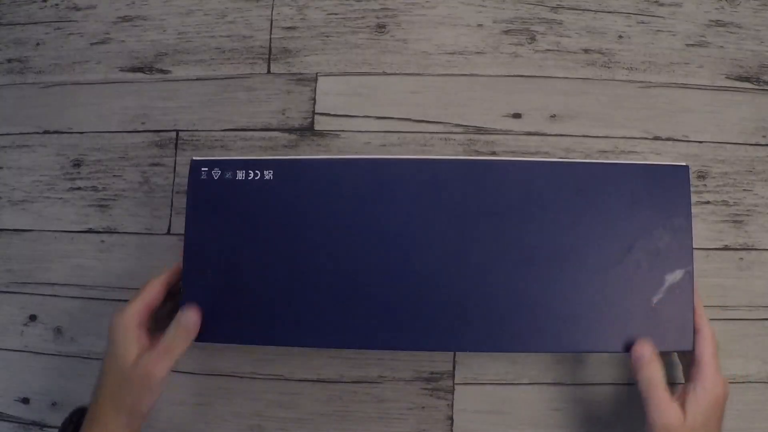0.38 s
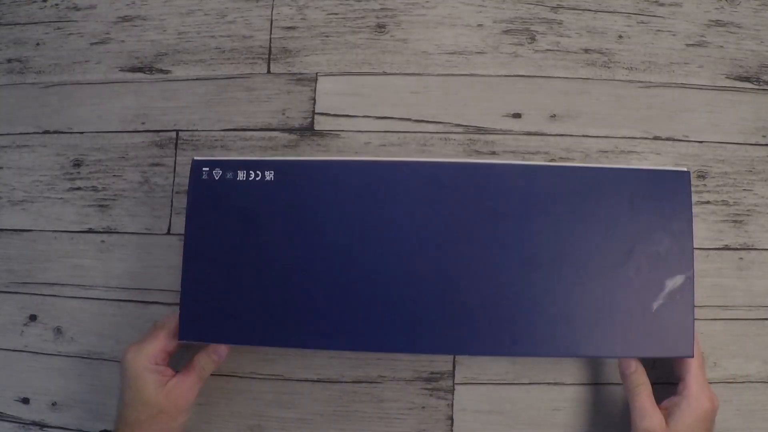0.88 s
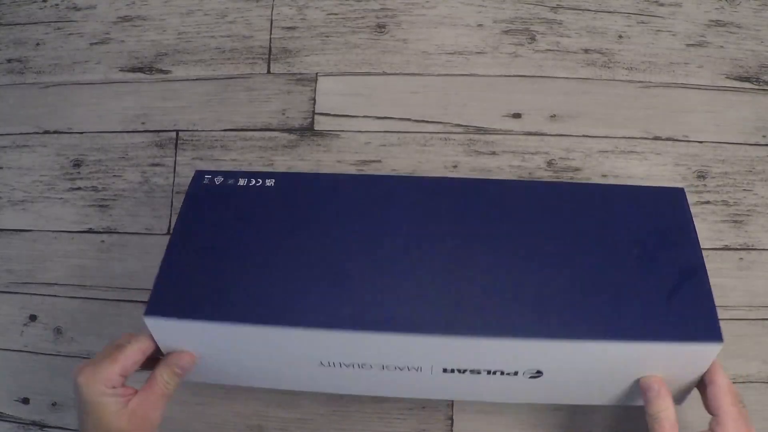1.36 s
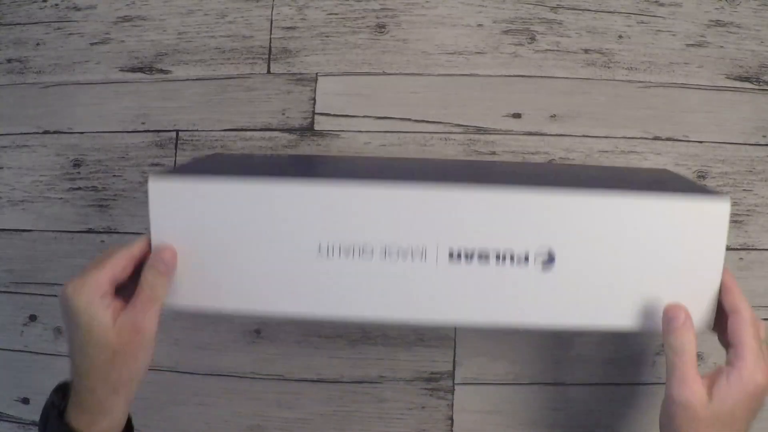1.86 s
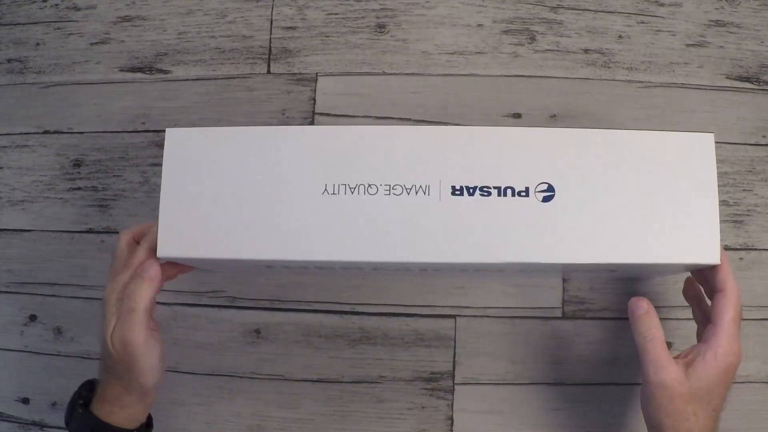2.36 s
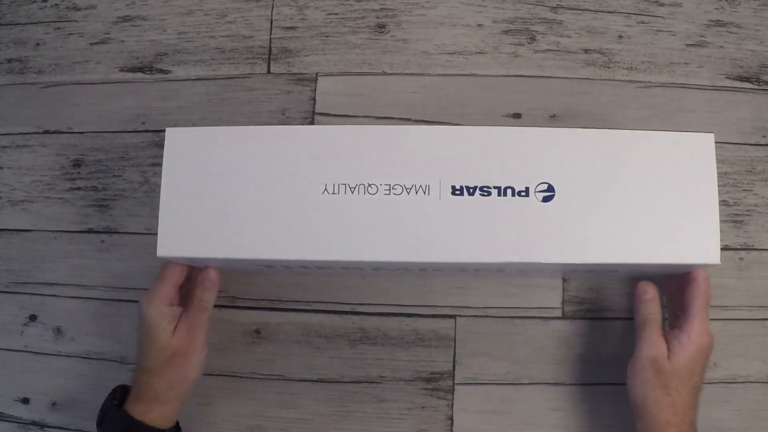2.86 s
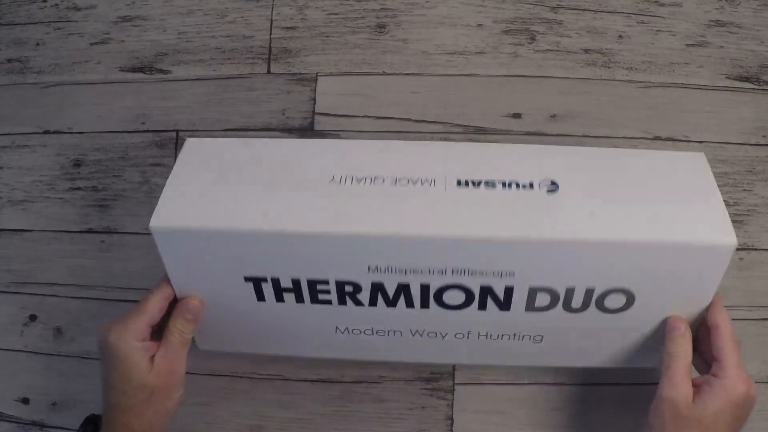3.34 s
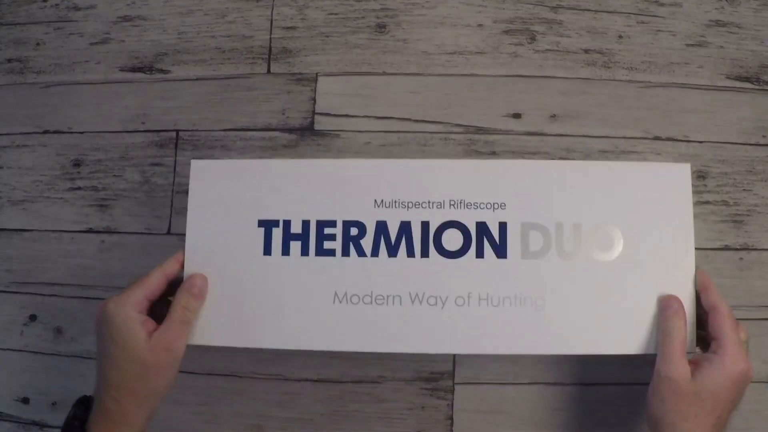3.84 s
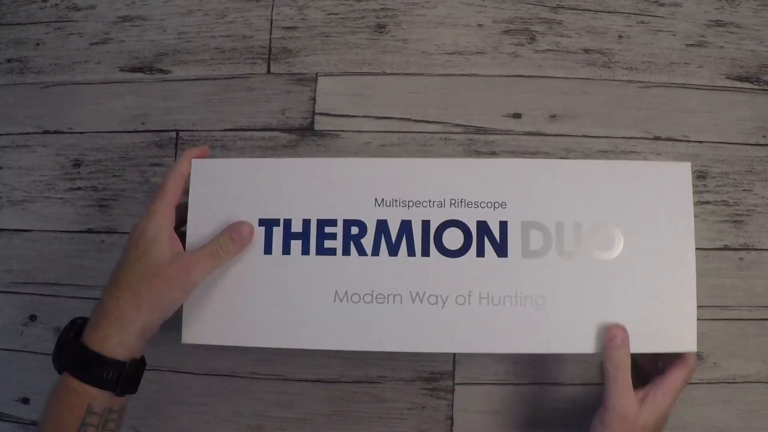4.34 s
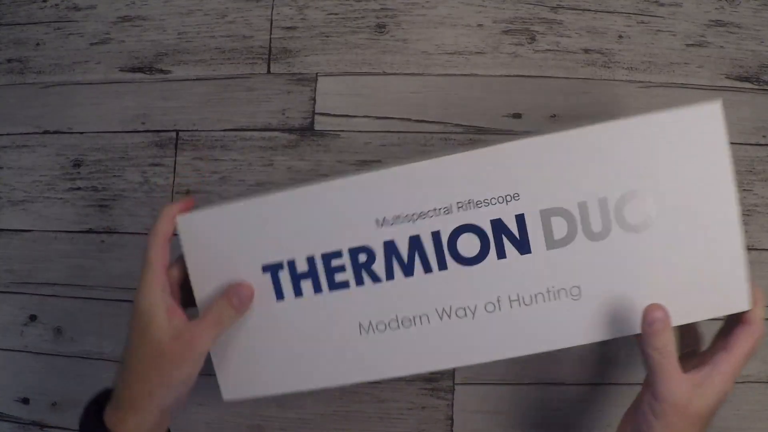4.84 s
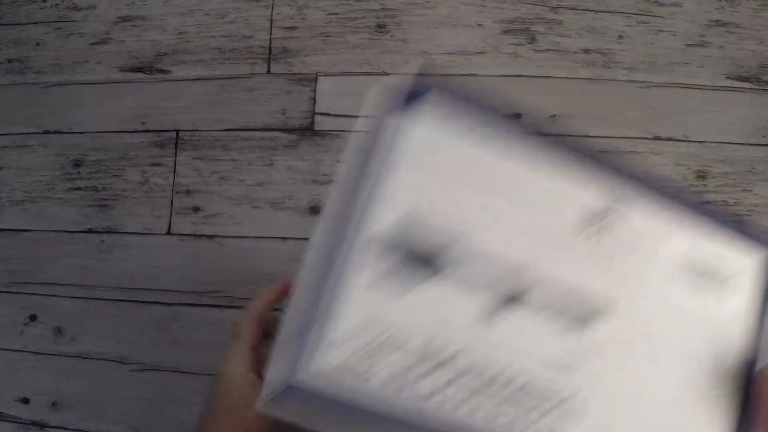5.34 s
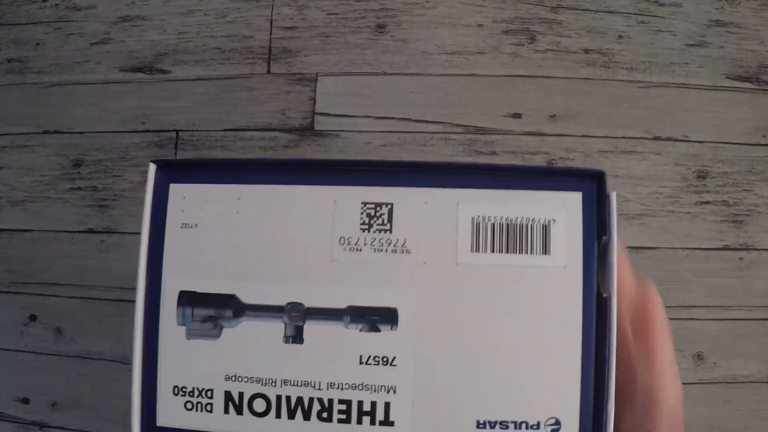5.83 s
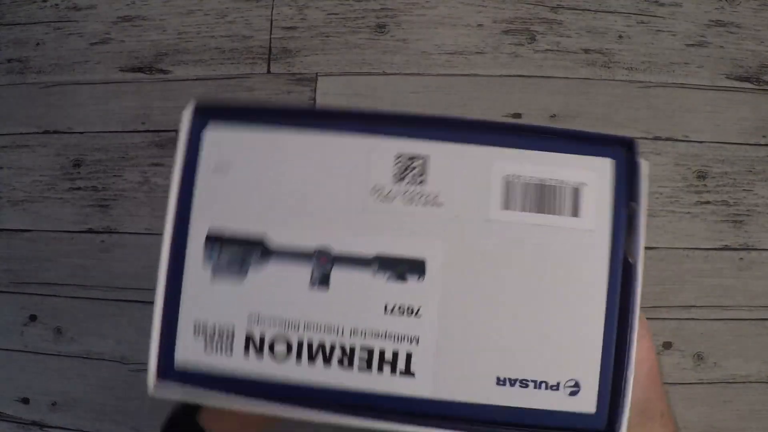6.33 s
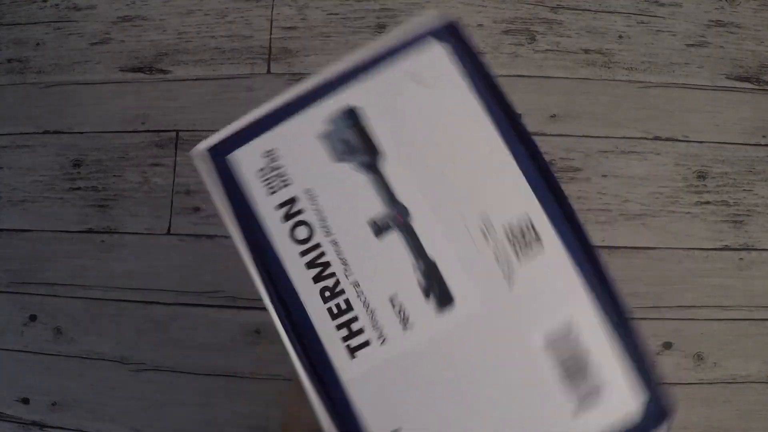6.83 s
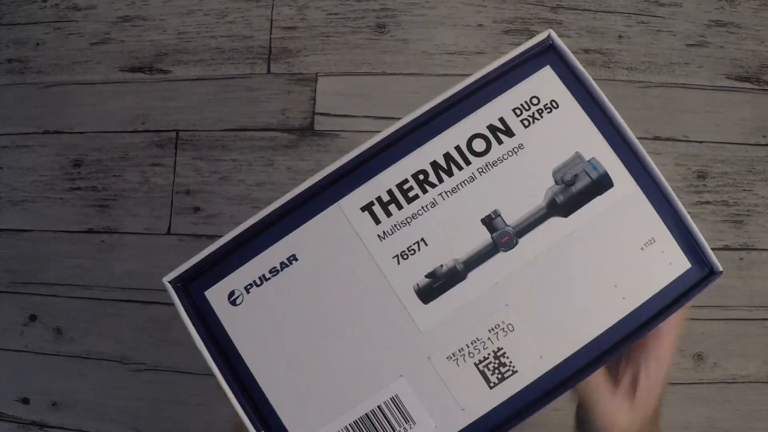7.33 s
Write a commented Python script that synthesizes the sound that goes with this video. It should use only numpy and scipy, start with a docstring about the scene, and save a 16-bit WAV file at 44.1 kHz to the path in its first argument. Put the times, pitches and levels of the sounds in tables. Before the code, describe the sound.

Hands turn a cardboard box on a wooden table, with rubbing card, skin hiss, small ticks and two loud dull knocks in a quiet room.

```python
"""Cardboard box on a wooden table

Quiet room, small microphone close by: hands tip a cardboard box over and turn it about.
Card drags over wood and skin hisses on its coating: random catches, shaped in time and spectrum.
Edges tick as short resonant snaps. A few dull landings ring box, table and metal legs as dying sines,
with a rattle of loose contents. Table shaking, a short room tail and a steady hush lie beneath."""
import sys
import numpy as np
from scipy import signal
from scipy.fft import rfft, irfft
from scipy.io import wavfile
from scipy.ndimage import uniform_filter1d

SR = 44100
rng = np.random.default_rng(int(sys.argv[2]) if len(sys.argv) > 2 else 0)


def output_pcm(signal):
    """Save a mono or channel-first signal as 16-bit PCM at the path in sys.argv[1].

    Samples are clipped to [-1, 1] before scaling.
    """
    pcm = np.clip(np.atleast_2d(signal).T, -1, 1) * 32767
    wavfile.write(sys.argv[1], SR, np.round(pcm).astype(np.int16))


def magnitude_from_level(level_db):
    """Linear magnitude for a level in decibels (20 dB per decade)."""
    exponent = np.asarray(level_db, float) / 20
    return 10 ** exponent


N = 339204  # samples
HZ = np.fft.rfftfreq(512, 1 / SR)  # bins of the short-time spectra
FRAMES = np.arange(N // 128 + 5) * 128 / SR  # their times in s

# All spectra below give relative power density: f/Hz, level/dB.
# Card dragged over wood, one row a stroke:
# t/s of most pressure, rise/s, fall/s, level/dB, tilt/(dB per octave) from 300 to 3000 Hz
STROKES = [(0.003, .05, 0.069, -54.5, -3.5), (0.1, 0.065, 0.21, -46, -4), (0.6, 0.5, .6, -75, -3.5),
           (1.19, 0.27, .2, -60.5, -1.5), (1.39, 0.27, 0.23, -54.5, -3), (1.52, 0.11, 0.091, -63, -2),
           (1.869, 0.087, 0.18, -66.5, -2.5), (1.96, 0.068, 0.062, -67, 3), (2.07, 0.14, .22, -62, 1),
           (2.93, 0.086, 0.18, -76, -2.5), (3.07, 0.22, 0.22, -68, 2), (3.26, .17, 0.23, -44.5, 5),
           (3.389, 0.15, 0.044, -47.5, -1.5), (3.5, 0.33, 0.12, -56, -6), (3.64, 0.12, 0.12, -50, -4),
           (3.85, 0.18, 0.18, -44.5, -4.5), (4.15, 0.41, 0.28, -68.5, -3), (4.42, 0.22, 0.59, -69, 1),
           (4.93, 0.21, 0.57, -60.5, -3.5), (5.09, 0.18, 0.36, -57, 0.5), (5.3, 0.14, 0.2, -54, 0),
           (5.42, 0.068, 0.062, -57, -1.5), (5.56, 0.081, 0.12, -63.5, 0.5), (5.65, 0.052, 0.088, -46.5, 2),
           (5.75, 0.18, 0.19, -45.5, -3.5), (6.03, 0.13, 0.18, -61.5, -1.5), (6.22, 0.32, 0.35, -63, 1),
           (6.37, 0.14, 0.2, -51.5, -2.5), (6.48, 0.15, 0.15, -46, -1.5), (6.68, 0.13, 0.11, -57.5, 1),
           (6.82, 0.16, 0.14, -47.5, -2), (6.96, 0.19, 0.13, -50.5, -2), (7.08, 0.29, 0.18, -47.5, 0.36),
           (7.18, 0.16, .12, -51.5, 0), (7.37, .15, .12, -70, -3.5), (7.5, 0.061, 0.034, -47.5, -7.5),
           (7.61, .15, .17, -48.5, .5)]
# Fingers sliding on the coated card: t/s of most pressure, rise/s, fall/s, level/dB
SLIDES = [(0.052, 0.16, 0.13, -72), (0.36, 0.45, 0.15, -85.5), (0.7, 0.16, .3, -89.5),
          (1.05, 0.19, 0.27, -73.5), (1.3, .3, 0.31, -77.5), (1.5, 0.39, 0.083, -80),
          (1.879, 0.21, 0.11, -86.5), (2.05, 0.14, 0.21, -74), (2.65, 0.28, .3, -86),
          (2.99, 0.087, 0.17, -76.5), (3.12, .11, 0.19, -57.5), (3.24, .16, 0.18, -58),
          (3.55, 0.32, 0.44, -73), (3.78, .2, 0.13, -71.5), (4.55, 0.36, 0.26, -79.5),
          (5.08, 0.53, 0.32, -78.5), (5.32, 0.29, 0.44, -72.5), (5.62, 0.095, 0.095, -64),
          (5.82, 0.21, 0.14, -69.5), (6.02, 0.26, 0.16, -75.5), (6.46, 0.27, 0.16, -67),
          (6.75, .17, 0.2, -72.5), (6.88, 0.21, 0.2, -73.5), (7.08, 0.28, 0.23, -65.5),
          (7.5, 0.086, .15, -71), (7.61, 0.14, .12, -68.5)]
# Squareness of strokes and of slides (1 pointed, 3 sudden): rise, fall
CARD_ROUND = (1.65, 1.55)
SKIN_ROUND = (1.8, 2.1)
# Spectrum of dragged card: f/Hz, level/dB
CARD = [(140, -25.5), (240, -4), (298, -3.5), (562, -6.5), (971, -9.5), (1930, -18), (2360, -24.5),
        (2930, -25.5), (3690, -33.5), (5000, -35.5), (6500, -37), (11000, -120)]
# Spectrum of skin on the coating: f/Hz, level/dB
SKIN = [(1470, -13.5), (2500, -4.5), (3060, -9), (3810, -8.5), (7430, -6), (10700, -11.5), (12000, -16),
        (15600, -52), (22000, -120)]
# Hollow of the box under the drag: f/Hz, width/Hz, level/dB
HOLLOW = [(265, 6.3, 0.5), (308, 11, -8.5), (500, 34, -14.5), (950, 50, -17.5), (1620, 27, -27)]
# Table top under the drag, each pass: f/Hz, width/Hz, level/dB
TABLE_TOP = [(122.8, 170, 4), (156, 16, 1.5)]
# Box wall left free by the grip: start t/s, end t/s, f/Hz, level/dB over the drag
FREE_WALL = [(0.997, 1.317, 797, 4.5), (1.001, 1.358, 1500, 3), (1.093, 1.51, 325, 9.5),
             (1.315, 1.505, 500, 10.5), (1.848, 1.98, 1120, 14), (3.15, 3.464, 300, 12.5),
             (3.162, 3.387, 920, 10), (3.145, 3.338, 1480, 0), (3.162, 3.33, 2190, -2),
             (3.572, 3.713, 265, -0.5), (5.056, 5.304, 1520, 10.5), (5.096, 5.296, 2310, 12),
             (5.032, 5.414, 860, 6), (5.62, 5.817, 192, 11), (5.646, 5.835, 265, -14),
             (5.655, 5.795, 430, 9.5), (6.38, 6.55, 855, 0), (6.774, 6.857, 345, 10),
             (7.01, 7.244, 440, -3), (7.52, 7.68, 1040, -4.5)]
# Table shaking under the hands: t/s, level/dB
THUMPS = [(0, -52), (0.699, -57), (1, -61.5), (1.85, -62.5), (2.0, -52), (2.3, -54.5), (2.6, -63.5),
          (3.2, -57), (3.4, -55), (3.6, -52), (4.6, -55.5), (6.1, -59.5), (6.3, -58), (6.5, -56),
          (6.8, -53), (7.1, -53), (7.3, -54), (7.69, -51)]
# Spectrum of that shaking: f/Hz, level/dB
SHAKE = [(5, -13.5), (8, 5.5), (18, 2), (27, -6.5), (41, -6), (55, -13.5), (100, -21.5), (140, -55),
         (300, -100)]
# Spectrum of the hush of room and microphone: f/Hz, level/dB
ROOM_AIR = [(47, -34), (80, 2), (281, -8.5), (377, -14), (949, -15), (1050, -40.5), (1300, -18),
            (2710, -25.5), (7890, -35.5), (12000, -29), (15600, -56.5), (22000, -120)]
# Decay of the room: f/Hz, t60/s
ROOM = [(100, 0.15), (400, 0.26), (1500, 0.51), (5000, 0.42), (11000, .35)]
# Landings: t/s, level/dB, contact/ms (the push peaks at a fifth of it),
# table weight/dB, box air/dB
KNOCKS = [(0.0588, -13.5, 1.67, -2, -5), (1.91, -57.5, 3.4, 10, -12), (2.0734, -34.5, 3.86, 14.5, -1),
          (2.492, -68.5, 1.8, -10, 9.5), (3.719, -31, 0.92, -3.5, -13.5), (3.7226, -9, 0.94, 2.5, -3),
          (3.728, -18.5, 0.81, -4.5, -2), (3.754, -16.5, 1.5, -18, -26.5), (5.657, -19.5, 2.5, 0.5, -0.5),
          (5.733, -44, 6.1, 11, 2), (7.4595, -45.5, 3.2, -1, 25.5), (7.4765, -50.5, 3.0, -4, 18)]
# Card walls struck by a landing: f/Hz, level/dB, t60/s
BOX = [(494, 17.5, 0.018), (1105, 13, 0.012), (2100, -13, 0.0047), (405, -10.5, .2), (452.5, -1.5, 0.073),
       (508, -13, 0.5), (629, -7.5, 0.15), (920, -8.5, 0.22), (1100, -12.5, .15), (1220, -9, 0.45),
       (1420, -3, 0.12), (1483, -15, .15), (1505, -6.5, 0.19), (2400, -13, .1)]
# Air in the hollow of the box: f/Hz, level/dB, t60/s
BOX_AIR = [(265, -2, 0.36), (300, -3.5, 0.54), (355, -18, 0.035)]
# Table struck by a landing: f/Hz, level/dB, t60/s
TABLE = [(71, -3, 0.14), (111, -4.5, 0.092), (118, -3, 0.26), (157.1, -1, 0.35)]
# The whole table rocking: f/Hz, level/dB, t60/s
SWAY = [(42.28, -11.5, 1.29), (51, -14, 0.32)]
# Metal legs, before their wavering: f/Hz, level/dB, t60/s
FRAME = [(186, -50, 2), (296, -38.5, 3), (540, -43, 3.4), (552, -41, 3.4), (723.5, -47.5, 4.8),
         (775, -45, 2.3)]
# Spectrum of the rattling contents: f/Hz, level/dB
RATTLE = [(150, -16), (250, -1.5), (671, -11), (1020, -8.5), (1150, -34.5), (1260, -10.5), (1990, -31),
          (6920, -66), (12000, -59), (15600, -75.5), (22000, -120)]
# Decay of the rattle: f/Hz, t60/s
RATTLE_T60 = [(100, 0.16), (500, 0.14), (2000, 0.12), (8000, 0.17)]
# Edges and fingers ticking on card: t/s, level/dB, f/Hz, treble spit level/dB, spit f/Hz
TICKS = [(0.0591, -29, 2000, -26, 4000), (0.312, -70, 900, 5, 6000), (0.3584, -43.5, 1200, -12, 2960),
         (0.366, -50, 1220, -23, 3000), (0.478, -67, 2120, -19, 3200), (0.5872, -57.5, 1090, -18, 2980),
         (0.641, -78, 800, 15, 7500), (0.6699, -69.5, 726, 16, 6100), (0.705, -79, 800, 13, 6500),
         (0.739, -56, 860, -2, 7050), (0.774, -54.5, 1340, -4, 3100), (0.7894, -51.5, 1416, -1.5, 3980),
         (0.8864, -64, 2060, 8, 5650), (1.8583, -46.5, 1050, -21, 7900), (1.906, -56, 1170, -21, 4430),
         (1.9268, -50, 1100, -26, 3000), (1.9387, -39.5, 1610, -8, 2930), (1.9434, -41, 1160, -15, 3800),
         (2.0706, -40, 800, -14, 3000), (2.134, -41, 2210, -12.5, 3000), (2.186, -48, 1560, -13.5, 3123),
         (2.318, -71, 1040, 5, 4000), (2.9208, -61.5, 1150, -22, 3790), (3.3335, -49, 2450, -21, 5700),
         (3.7207, -31.5, 2650, 1.5, 4200), (3.7225, -28, 2320, -9, 4100), (3.757, -43.5, 1400, 6, 7060),
         (3.991, -66, 1510, -7, 5300), (4.006, -46.5, 1270, -20, 2870), (4.3888, -56.5, 1860, -22.5, 2977),
         (5.3944, -41.5, 2100, 2, 3480), (5.4021, -39.5, 1700, 0, 3000), (5.4732, -51.5, 1650, 6, 8050),
         (5.654, -41, 2080, -3, 4000), (5.787, -39, 2400, 0, 4020), (6.319, -44, 890, -12, 3900),
         (6.3997, -47, 950, -22, 4340), (6.6557, -50.5, 2400, 6, 3020), (6.9066, -50, 990, -24, 3220),
         (7.293, -57, 1390, -15, 3200), (7.357, -60, 1225, -8, 5600), (7.4245, -58, 600, -8, 3900),
         (7.445, -59, 2730, 2, 3160), (7.475, -47, 1930, -1, 5030), (7.5319, -44, 1200, -14.5, 3100)]

EDGE_DB = -20  # a stroke is this far down one rise before or one fall after its peak
TOUCH_DB, REST_DB = -86, -89  # drag and hiss of hands that merely hold the box
# table top level: TABLE_DB for a drag at the knee, then a share of each dB, and dB per unit of tilt
TABLE_KNEE_DB, TABLE_DB, TABLE_SHARE, DULL_DB = -65, -71, 0.69, -1
WALL_WIDTH_HZ = 64
ROOM_AIR_DB = -79.5
RATTLE_DB, RATTLE_DB_PER_MS = -4.5, -3.5  # softer contacts shake the contents less
TICK_T60_S = 0.024
MIC_TOP_HZ = 11340


def evened(x):
    """Scales x to an rms of one."""
    return x / np.sqrt(np.mean(np.abs(x) ** 2) + 1e-20)


def read(points, hz):
    """Reads a curve between its points, along a logarithmic frequency axis."""
    f, value = np.transpose(points)
    return np.interp(np.log(hz + 1), np.log(f + 1), value)


def add(mix, s, sound):
    """Lays a sound into the mix from s seconds on."""
    part = mix[round(s * SR):][:len(sound)]
    part += sound[:len(part)]


def coloured(x, gain):
    """Shapes x by a gain over frequency and time."""
    z = signal.stft(x, nperseg=512, noverlap=384)[2]
    shaped = z * gain[:, :z.shape[1]]
    return signal.istft(shaped, nperseg=512, noverlap=384)[1][:len(x)]


def unit(points):
    """Gain of a spectrum that keeps the power of white noise."""
    return evened(magnitude_from_level(read(points, HZ)))[:, None]


def steady(points):
    """Unbroken noise of rms one with the given spectrum."""
    spectrum = rfft(rng.standard_normal(N))
    gain = magnitude_from_level(read(points, np.fft.rfftfreq(N, 1 / SR)))
    return evened(irfft(spectrum * gain, N))


def resonant(x, peaks):
    """Sum of resonances driven side by side by x."""
    return sum(magnitude_from_level(db) * signal.lfilter(*signal.iirpeak(hz, hz / width, SR), x)
               for hz, width, db in peaks)


def band(x, hz, q):
    """A broad resonance applied twice, at rms one."""
    b, a = signal.iirpeak(hz, q, SR)
    return evened(signal.lfilter(b, a, signal.lfilter(b, a, x)))


def ringing(modes, t):
    """Dying sines, alternating in sign as neighbouring modes do."""
    return sum((-1) ** k * magnitude_from_level(db - 60 * t / t60) * np.sin(2 * np.pi * hz * t)
               for k, (hz, db, t60) in enumerate(modes))


def swells(rows, shape):
    """Power of each stroke over time: a rounded rise to its peak and a rounded fall."""
    s, rise, fall, peak_db = np.transpose(rows)[:4, :, None]
    before = np.maximum(s - FRAMES, 0) / rise
    after = np.maximum(FRAMES - s, 0) / fall
    return magnitude_from_level(peak_db + EDGE_DB * (before ** shape[0] + after ** shape[1])) ** 2


def fibres(per_s, spread_db):
    """Tiny catches of uneven size along the rubbing surfaces."""
    size = magnitude_from_level(spread_db * np.minimum(rng.exponential(1, N), 5))
    signed = size * rng.choice([-1., 1.], N)
    return evened(signed * (rng.random(N) < per_s / SR))


def patches(patchy_db, jerky_db):
    """Uneven pressure: blotches over frequency and jerks shared by all of it."""
    field = rng.standard_normal((len(HZ), len(FRAMES)))
    field = uniform_filter1d(field, size=5, axis=0)
    blotch = evened(uniform_filter1d(field, size=16, axis=1))
    jerk = evened(uniform_filter1d(rng.standard_normal(len(FRAMES)), size=6))
    return magnitude_from_level(patchy_db * blotch + jerky_db * jerk)


def card_drag(catches, power, tilt_db):
    """Catching fibres shake the card, harder with pressure and with a tilt of its own each stroke."""
    octaves = np.log2(np.clip(HZ, 300, 3000) / 500)[:, None]
    gain = unit(CARD) * np.sqrt(power) * magnitude_from_level(tilt_db * octaves)
    return coloured(catches, gain * patches(patchy_db=1.0, jerky_db=0.14))


def table_top(catches, power, tilt_db):
    """The same catches ring the table top, which feels a share of the drag, more of dull strokes."""
    table = evened(resonant(resonant(catches, TABLE_TOP), TABLE_TOP))
    drag_db = 10 * np.log10(power)
    table_db = TABLE_DB + TABLE_SHARE * (drag_db - TABLE_KNEE_DB) + DULL_DB * tilt_db
    return table * magnitude_from_level(np.interp(np.arange(N) / SR, FRAMES, table_db))


def finger_hiss():
    """Skin sliding on the coating catches densely and hisses."""
    power = swells(SLIDES, SKIN_ROUND).sum(0) + magnitude_from_level(REST_DB) ** 2
    gain = unit(SKIN) * np.sqrt(power) * patches(patchy_db=1.5, jerky_db=0.96)
    return coloured(fibres(12000, spread_db=2.0), gain)


def drag():
    """Rubbing shakes the card, its hollow, its free walls and the table top; fingers hiss."""
    each = swells(STROKES, CARD_ROUND)
    power = each.sum(0) + magnitude_from_level(TOUCH_DB) ** 2
    tilt_db = np.transpose(STROKES)[4] @ each / power  # strokes weighted by their power
    catches = fibres(4000, spread_db=2.0)
    card = card_drag(catches, power, tilt_db)
    table = table_top(catches, power, tilt_db)
    return card + resonant(card, HOLLOW) + free_walls(card) + table + finger_hiss()


def thumps():
    """Low shaking that reaches the microphone through the table."""
    return steady(SHAKE) * magnitude_from_level(np.interp(np.arange(N) / SR, *np.transpose(THUMPS)))


def room_air():
    """The steady hush of the room and the microphone."""
    return magnitude_from_level(ROOM_AIR_DB) * steady(ROOM_AIR)


def room(x):
    """Sparse reflections of random sign, each band dying at its own speed."""
    taps = np.zeros(SR)
    at = np.arange(200, SR - 20, 20)
    taps[at + rng.integers(0, 20, len(at))] = rng.choice([-1., 1.], len(at))
    tail = coloured(taps, magnitude_from_level(-60 * FRAMES / read(ROOM, HZ)[:, None]))
    return signal.fftconvolve(x, tail / np.linalg.norm(tail))[:N]


def knock(s, level_db, contact_ms, weight_db, air_db):
    """A brief push rings box, table and legs; loose contents add a dying rattle."""
    seconds = 1.5 if level_db > -30 else .6  # soft landings sink into the hush sooner
    t = np.arange(round(seconds * SR)) / SR
    u = t[:900] * 1000 / max(contact_ms / 5, .02)
    push = u * np.exp(-u)  # the force rises fast and eases off
    ring = ringing(BOX, t) + magnitude_from_level(air_db) * ringing(BOX_AIR, t) + magnitude_from_level(weight_db) * ringing(TABLE, t)
    ring = signal.fftconvolve(ring, push / push.sum())[:len(t)]
    ring = ring + ringing(SWAY, t) + legs(t)
    rattle_db = RATTLE_DB + RATTLE_DB_PER_MS * contact_ms
    return s, magnitude_from_level(level_db) * (-.35 * ring + magnitude_from_level(rattle_db) * rattle(t))


def legs(t):
    """Loose joints make each ring of the legs waver in its own way."""
    knots = np.arange(0, t[-1], .032)
    out = np.zeros(len(t))
    for mode in FRAME:
        waver = 0.28 + 0.99 * rng.standard_normal(len(knots))
        out += np.interp(t, knots, waver) * ringing([mode], t)
    return out


def rattle(t):
    """Loose contents: noise with a soft onset, each band dying at its own speed."""
    fade = magnitude_from_level(-60 * FRAMES / read(RATTLE_T60, HZ)[:, None])
    noise = coloured(rng.standard_normal(len(t)), unit(RATTLE) * fade)
    return noise * (1 - np.exp(-t / 0.0015))


def tick(s, level_db, hz, spit_db, spit_hz):
    """A snap rings the card edge, thumps the wall below it and spits a little treble."""
    t = np.arange(3000) / SR
    noise = rng.standard_normal((3, len(t)))
    edge = band(noise[0], hz, 0.92) + 1.3 * np.sin(2 * np.pi * hz * t)
    wall = band(noise[2], hz / 2.4, 0.98)
    spit = band(noise[1], spit_hz, 1.8) * magnitude_from_level(spit_db - 60 * t / (0.2 * TICK_T60_S))
    body = (0.43 * edge + 0.45 * wall) * magnitude_from_level(-60 * t / TICK_T60_S)
    return s, magnitude_from_level(level_db) * (body + spit) * (1 - np.exp(-t / 0.00037))


def free_walls(card):
    """Walls left free sing along with the drag, each fading in and out with the grip."""
    out = np.zeros(N)
    for start, end, hz, db in FREE_WALL:
        part = card[round(start * SR):round(end * SR)]
        grip = np.hanning(len(part)) ** .5
        add(out, start, resonant(part * grip, [(hz, WALL_WIDTH_HZ, db)]))
    return out


def scene():
    """Landings, ticks and rubbing close by, their room tail, the shaking table and the hush."""
    hits = np.zeros(N)
    for row in KNOCKS:
        add(hits, *knock(*row))
    for row in TICKS:
        add(hits, *tick(*row))
    rubbing = drag()
    tail = room(magnitude_from_level(-11) * hits + magnitude_from_level(-16.5) * rubbing)
    return (hits + rubbing + tail + thumps() + room_air())[None]


def band_limit(x):
    """A steep low-pass at the top of the band."""
    return signal.sosfilt(signal.butter(12, 12390, fs=SR, output="sos"), x)


def record(dry):
    """The microphone's input stage flattens the tips of the loudest knock; the top octave rolls off."""
    ceiling = .48  # of full scale
    flattened = dry / (1 + (dry / ceiling) ** 6) ** (1 / 6)
    mix = signal.lfilter(*signal.butter(4, MIC_TOP_HZ, fs=SR), flattened)
    return band_limit(mix)


dry = scene()
out = record(dry)
output_pcm(out)
```